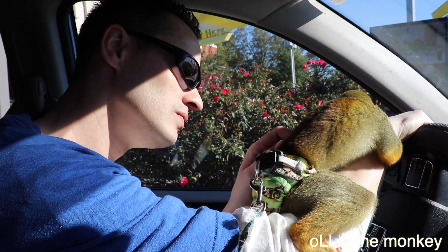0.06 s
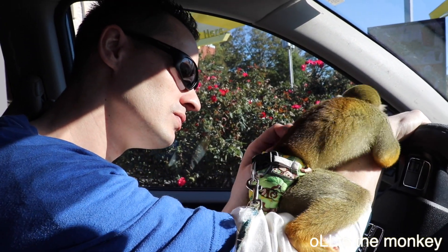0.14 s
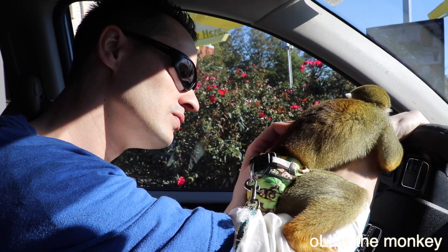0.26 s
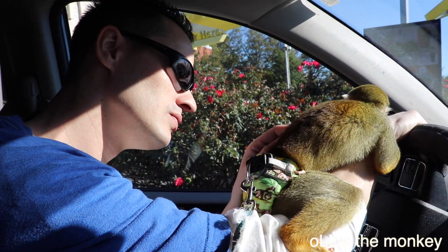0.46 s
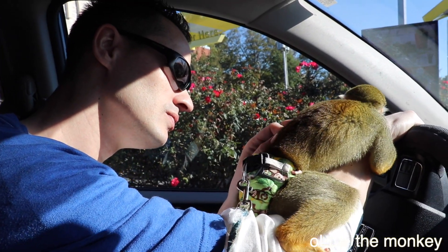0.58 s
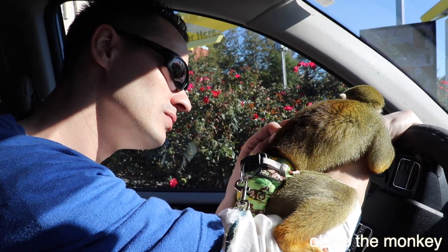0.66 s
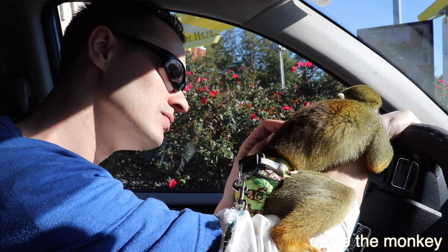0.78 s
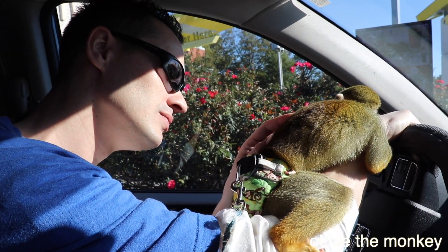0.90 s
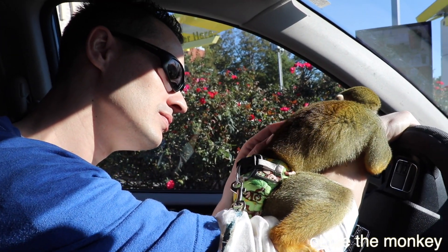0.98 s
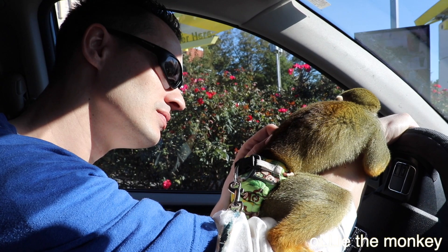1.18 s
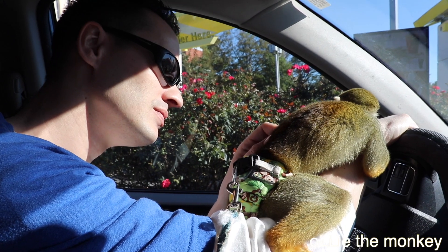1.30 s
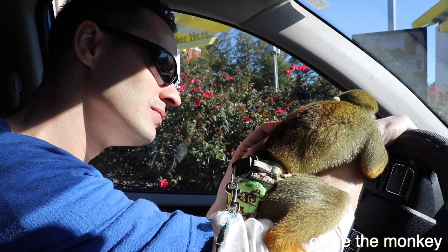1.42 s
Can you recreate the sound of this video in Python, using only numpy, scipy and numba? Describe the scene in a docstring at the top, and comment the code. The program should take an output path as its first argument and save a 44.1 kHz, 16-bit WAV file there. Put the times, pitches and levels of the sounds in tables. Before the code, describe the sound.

A small monkey calls close by inside a parked car. Faint cloth rustles from the start; at 0.11 s comes a brief rising squawk that breaks into rasp, then at 0.21 s a much louder, piercing pure chirp sliding down, gone by 0.25 s with a very short cabin echo. The engine's low throbbing idle and soft hiss continue throughout; at 1.25 s a buckle ticks faintly.

```python
"""Inside a parked car the engine idles throughout: wavering firing orders, a throbbing drone and steady hiss.
Cloth rustles at the start, as shaped noise. At 0.11 s a small monkey gives a harsh rising squawk, harmonics that
break into half-rate rasp and noise. At 0.21 s comes its loud, very high falling chirp, a sine between puffs of air;
gain control ducks under it. At 1.25 s a buckle ticks, as short ringing modes. Calls and ticks echo in the cabin."""
import sys
import numpy as np
from scipy import signal
from scipy.fft import rfft, irfft, next_fast_len
from scipy.io import wavfile
from scipy.ndimage import uniform_filter1d, map_coordinates
from numba import njit

SR = 44100
rng = np.random.default_rng(int(sys.argv[2]) if len(sys.argv) > 2 else 0)


def digitize_waveform(pressure):
    """Quantize a signal to 16-bit integers and store it at the path in sys.argv[1].

    Rows of a 2-D input are taken as channels; values are limited to [-1, 1].
    """
    field = np.atleast_2d(pressure).T
    bounded = np.clip(field, -1, 1)
    quanta = np.round(bounded * 32767).astype(np.int16)
    wavfile.write(sys.argv[1], SR, quanta)


def rack_gain(trim_db):
    """Turn a fader trim in dB into the linear factor to multiply a signal by."""
    fader = np.asarray(trim_db, float)
    return 10 ** (fader / 20)


N = 63945
TIME = np.arange(N) / SR


def unit(x):
    """Bring to rms 1."""
    return x / np.sqrt(np.mean(x ** 2) + 1e-20)


def along(points, hz):
    """Read a curve of (frequency, value) points on a log frequency axis."""
    point_hz, value = np.transpose(points)
    return np.interp(np.log(hz + 1), np.log(point_hz + 1), value)


def curves(rows):
    """Draw one value per sample for each column after the time."""
    time_s, *columns = np.transpose(rows)
    return [np.interp(TIME, time_s, column) for column in columns]


def inside(rows):
    """True between the first and last row."""
    return (TIME > rows[0][0]) & (TIME < rows[-1][0])


def wobble(rate):
    """A smooth random curve with rate knots a second."""
    knots = rng.standard_normal(int(N * rate / SR) + 4)
    return map_coordinates(knots, [TIME * rate])


def filtered(x, response):
    """Multiply the spectrum of x by a complex response of frequency."""
    size = next_fast_len(N + SR // 4)
    spectrum = rfft(x, size) * response(np.fft.rfftfreq(size, 1 / SR))
    return irfft(spectrum, size)[..., :N]


def noise(colour):
    """Coloured noise of rms 1, faded out below its lowest point."""
    closed = [(1, -120), (colour[0][0] / 2, -60)] + list(colour)
    return unit(filtered(rng.standard_normal(N), lambda hz: rack_gain(along(closed, hz))))


def stack(hz, colour, count, tilt_db=0):
    """Harmonics of a moving pitch through a colour tilted per kHz, rms 1."""
    k = np.arange(1, count + 1)[:, None]
    gain = rack_gain(along(colour, k * hz) + tilt_db * k * hz / 1000)
    phase = k * 2 * np.pi * np.cumsum(hz) / SR + k * k
    return np.sum(gain * np.sin(phase), 0) / np.sqrt(np.sum(gain ** 2, 0) / 2)


def ports(x, lag_s, pan_db, lead=((1, 0),)):
    """Two microphone ports: the left later by lag_s, louder by pan_db and ahead in phase by lead (radians)."""
    side = np.array([[.5], [-.5]])  # half of each difference on either port

    def response(hz):
        phase = along(lead, hz) - 2 * np.pi * hz * lag_s
        return rack_gain(side * pan_db) * np.exp(1j * side * phase)

    return filtered(x, response)


# Likeness of the two ports in diffuse sound: frequency_hz, likeness (0-1)
PORT_LIKENESS = [(60, 1), (300, 0.967), (700, 0.976), (1300, 0.51), (3000, 0.139), (8000, 0.077)]


def spread(colour):
    """Stereo noise, alike in the bass and nearly unrelated in the treble, from a mid and a side noise."""
    def mid_and_side(hz):
        angle = np.arccos(np.clip(along(PORT_LIKENESS, hz), -1, 1)) / 2
        return np.array([np.cos(angle), np.sin(angle)])

    mid, side = filtered(np.array([noise(colour), noise(colour)]), mid_and_side)
    return np.array([mid + side, mid - side])


# Squawk: time_s, pitch_hz, level_db, roughness (0-1, clipped)
SQUAWK_PATH = [(.110, 1960, -62, 0), (.113, 1952, -46.5, 0.08), (.117, 1803, -70, 0), (.121, 1770, -57, 0),
               (.1235, 1789, -32, .02), (.128, 1862, -31.5, 0.1), (.135, 1952, -24.5, 0),
               (.141, 2026, -34, 0), (.145, 2061, -24.5, 0.08), (.1485, 2097, -29.5, 0.12),
               (.1505, 2023, -25, .97), (.154, 1925, -30, 1.01), (.160, 1861, -29.5, 0.9),
               (.166, 1820, -42, 1), (.178, 1780, -57.5, 1)]
# Colour of the clean voice: frequency_hz, level_db
THROAT_COLOUR = [(1000, -38), (1750, -17.5), (2100, -5), (3500, -5.5), (4200, -1), (5400, -0.5),
                 (6300, 1.5), (7300, -12), (8200, -5), (9200, -15.5), (10300, -12.5), (11300, -26.5),
                 (12400, -14.5), (13500, -37), (15700, -59.5), (22000, -120)]
# Colour of the broken voice and its leaking air: frequency_hz, level_db
RASP_COLOUR = [(1500, -29), (2300, -16), (2850, -3.5), (3350, -6.5), (3750, 0), (4500, -2), (6700, -3.5),
               (7300, -8.5), (8200, -3.5), (9200, -5.5), (10000, -11.5), (12500, -13.5), (14000, -40),
               (16000, -50)]


def squawk():
    """Clean harmonics; with roughness the folds skip to half the rate, shake and leak air."""
    hz, level_db, rough = curves(SQUAWK_PATH)
    rough = np.clip(rough, 0, 1)
    # The mouth opens and lets the upper harmonics out
    open_s, open_takes_s, shut_db_per_khz = 0.1219, 0.00895, -2
    shut = np.clip(1 - (TIME - open_s) / open_takes_s, 0, 1)
    clean_hz = hz * (1 + 0.002 * wobble(497))
    tone = stack(clean_hz, THROAT_COLOUR, count=7, tilt_db=shut_db_per_khz * shut)
    rasp_hz = hz / 2 * (1 + 0.03 * wobble(300))
    air_ratio = 1.5  # noise against tone
    rasp = unit(stack(rasp_hz, RASP_COLOUR, count=15) + air_ratio * noise(RASP_COLOUR))
    voice = np.sqrt(1 - rough ** 2) * tone + rough * rasp
    return inside(SQUAWK_PATH) * rack_gain(level_db) * voice


# Chirp: time_s, pitch_hz, level_db, left_minus_right_db as the head turns
CHIRP_PATH = [(.208, 10500, -72, 0), (.2125, 10840, -14, 5.5), (.2165, 10720, -7, 10),
              (.221, 10780, -2.5, 7.5), (.225, 10690, -2, -2), (.229, 10370, -8, -9),
              (.234, 10070, -4.5, -5.5), (.240, 9858, -11.5, -5), (.246, 9457, -11.5, -9),
              (.250, 9278, -29, -8), (.254, 9350, -72, -5.5)]
# Bursts of air as the chirp starts and stops: start_s, level_db
AIR_BURSTS = [(0.2082, -25.5), (.250, -38.5)]
# Colour of the first burst: frequency_hz, level_db per Hz
PUFF_COLOUR = [(1500, -8.5), (4000, -13.5), (7000, -5), (9000, -4), (11200, 6), (12400, 7.5), (13400, 1),
               (14300, -25), (16000, -42)]
# Duller air as the mouth closes: frequency_hz, level_db per Hz
SIGH_COLOUR = [(1500, -7.5), (3000, -3.5), (7000, -6.5), (8800, -3), (10500, -29.5), (16000, -70.5)]


def chirp():
    """A pure whistle that holds and slides down between puffs of air; also its leaning between the ports."""
    hz, level_db, pan_db = curves(CHIRP_PATH)
    sine = np.sqrt(2) * np.sin(2 * np.pi * np.cumsum(hz) / SR)
    whistle = inside(CHIRP_PATH) * rack_gain(level_db) * sine
    rise_s, t60_s = 0.00197, 0.03407
    air = np.zeros(N)
    for (start_s, burst_db), colour in zip(AIR_BURSTS, (PUFF_COLOUR, SIGH_COLOUR)):
        since_s = np.maximum(TIME - start_s, 0)
        swell = 1 - np.exp(-since_s / rise_s)
        air += rack_gain(burst_db - 60 * since_s / t60_s) * swell * noise(colour)
    lean = rack_gain(np.array([pan_db, -pan_db]) / 2)
    return whistle + air, lean


# Ticks: start_s, level_db (nominal peak)
TICK_TIMES = [(1.2498, -35), (1.251, -37.5), (1.2523, -38.5), (1.2556, -45.5)]
# Ringing modes of the buckle: frequency_hz, level_db before a random scatter, t60_s
BUCKLE_MODES = [(5850, -10.5, 0.0165), (7470, -0.5, 0.007), (8583, 7.5, 0.0088), (9310, -7, 0.006),
                (11500, -6.5, 0.006), (13290, -13, 0.0041)]


def buckle():
    """Small ticks ring a few short modes behind a burst of bright noise."""
    out = np.zeros(N + SR)
    t = np.arange(SR // 20) / SR
    for start_s, level_db in TICK_TIMES:
        ring = np.zeros(len(t))
        for hz, mode_db, t60_s in BUCKLE_MODES:
            scattered_db = mode_db + rng.normal(0, 2.15)
            ring += rack_gain(scattered_db - 60 * t / t60_s) * np.sin(2 * np.pi * hz * t)
        bright_noise = np.gradient(rng.standard_normal(len(t)))
        click = 2.2 * rack_gain(-60 * t / 0.00305) * bright_noise
        out[round(start_s * SR):][:len(t)] += rack_gain(level_db - 11) * (ring + click)
    return out[:N]


# Rustle: time_s, level_db
RUSTLE_PATH = [(0, -55.5), (.06, -54), (.085, -46.5), (.11, -51.5), (.2, -52), (.3, -75)]
# Colour of rubbing cloth: frequency_hz, level_db per Hz
CLOTH_COLOUR = [(1000, -2.5), (2500, 3.5), (5000, -3), (9000, -10), (13000, -15), (16000, -34)]


def cloth():
    """A lumpy rustle: coloured noise whose level wobbles quickly."""
    level_db, = curves(RUSTLE_PATH)
    return rack_gain(level_db + 4 * wobble(90)) * spread(CLOTH_COLOUR)


# Engine orders: multiple of the firing rate, level_db (rms)
ENGINE_ORDERS = [(1, -40.5), (2, -49.5), (3, -56), (4, -47.5), (7, -57.5), (9.5, -54)]
# Colour of the cabin drone: frequency_hz, level_db per Hz
DRONE_COLOUR = [(20, -11.5), (38, -9), (54, -12), (86, -11.5), (125, -7.5), (151, -14), (220, -11),
                (300, -15), (374, -18), (500, -11), (540, -8), (558, -14), (590, -8), (670, -26.5),
                (795, -16), (1200, -42)]
# Colour of the vents and microphone: frequency_hz, level_db per Hz
HISS_COLOUR = [(530, -41), (900, -12), (1070, -7), (1470, -9.5), (1620, -5.5), (2010, -11.5), (3140, -16.5),
               (4080, -19), (8000, -23.5), (12100, -28.5), (15800, -33.5)]


def engine():
    """Unsteady low orders over a drone that swells with each firing, and hiss."""
    firing_hz, throb_depth = 31.056, 0.074
    drone_db, hiss_db = -37, -50
    waver_db, waver_rad = 1.3553, 0.55  # for the first order; higher ones waver more
    turn = 2 * np.pi * firing_hz * TIME
    hum = np.zeros(N)
    for k, order_db in ENGINE_ORDERS:
        level_db = order_db + waver_db * np.sqrt(k) * wobble(2.4105 * k + 2)
        phase = k * turn + waver_rad * np.sqrt(k) * wobble(5.864) + rng.uniform(0, 2 * np.pi)
        hum += rack_gain(level_db) * np.sqrt(2) * np.sin(phase)
    throb = 1 + throb_depth * np.cos(turn)
    drone_noise = spread(DRONE_COLOUR + [(1500, -58.5), (3000, -120)])  # closed above the bass
    drone = rack_gain(drone_db + 1.2 * wobble(5.548)) * throb * drone_noise
    hiss = rack_gain(hiss_db + 0.99 * wobble(4.274)) * spread(HISS_COLOUR)
    return hum + drone + hiss


# Decay of the cabin: frequency_hz, t60_s
CABIN_DECAY = [(1500, 0.04), (5000, 0.0519), (8800, 0.0644), (9800, 0.0441), (10400, .052), (11000, 0.0286),
               (15000, 0.025)]


def cabin(x):
    """Glass and seats answer with a noise tail; each frequency dies at its own speed."""
    level_db, pan_db, gap_s = -3.5, -4, 0.0027
    hz, t, bins = signal.stft(rng.standard_normal((2, SR // 5)), SR, nperseg=128)
    decay = rack_gain(-60 * t / along(CABIN_DECAY, hz)[:, None])
    tail = signal.istft(bins * decay, SR, nperseg=128)[1]
    tail = tail / np.linalg.norm(tail[0])
    late = np.pad(x, (round(gap_s * SR), 0))[None]
    gain = rack_gain(level_db + np.array([[.5], [-.5]]) * pan_db)
    return gain * signal.fftconvolve(late, tail, axes=1)[:, :N]


# Squawk bending round the camera: frequency_hz, left_lead_rad
SQUAWK_PORT_LEAD = [(2000, -1.6), (2850, -1.5), (3700, -.6), (6000, -1.9), (8000, 1.2), (10000, 1.5),
                    (12200, 2.8)]


def scene():
    """Near sounds reach both ports and ring in the cabin, over the engine and cloth."""
    call, (peep, lean), tick = squawk(), chirp(), buckle()
    near = ports(call, lag_s=0, pan_db=-3, lead=SQUAWK_PORT_LEAD)
    near = near + ports(tick, lag_s=0.00002, pan_db=2.5)
    near = near + lean * ports(peep, lag_s=0.0002, pan_db=0)
    # The squawk and ticks ring less in the cabin than the chirp
    echo = cabin(rack_gain(-7) * call + peep + rack_gain(-7.5) * tick)
    background = ports(engine() + cloth(), lag_s=0.0002003, pan_db=-1.25)
    return near + echo + background


@njit
def follow(need, grab, let_go):
    """Gain cut that comes fast and leaves slowly."""
    cut, out = 0., np.zeros(len(need))
    for i in range(len(need)):
        cut += (need[i] - cut) * (grab if need[i] > cut else let_go)
        out[i] = cut
    return out


def top_cut(x):
    """Nothing passes above the cut-off."""
    return signal.sosfilt(signal.butter(12, 15800, fs=SR, output="sos"), x)


def record(dry):
    """The camera's gain control turns loud moments down, then a low cut clears the deepest bass."""
    limit_db, cut_per_db = -22.5, 0.587
    grab_s, let_go_s, low_cut_hz = 0.00695, 0.056, 13
    power = np.abs(uniform_filter1d(np.mean(dry ** 2, 0), size=64))
    level_db = 10 * np.log10(power + 1e-12)
    need_db = cut_per_db * np.maximum(level_db - limit_db, 0)
    cut_db = follow(need_db, 1 / (grab_s * SR), 1 / (let_go_s * SR))
    mix = filtered(dry * rack_gain(-cut_db), lambda hz: hz ** 4 / (hz ** 4 + low_cut_hz ** 4))
    return top_cut(mix)


dry = scene()
out = record(dry)
digitize_waveform(out)
```